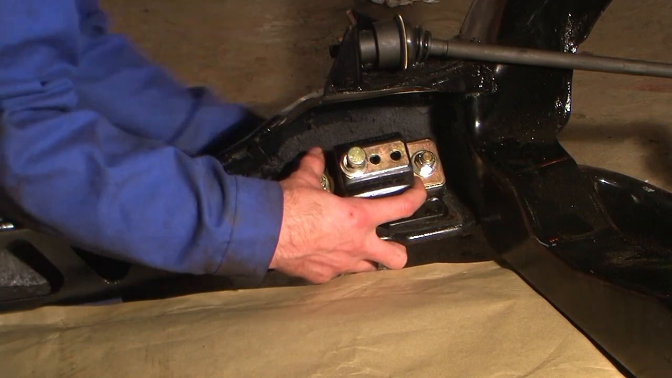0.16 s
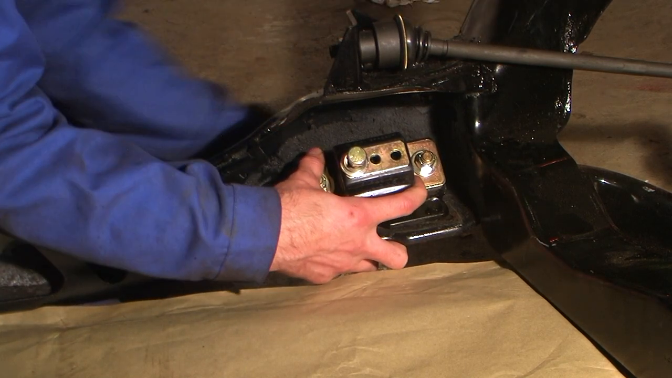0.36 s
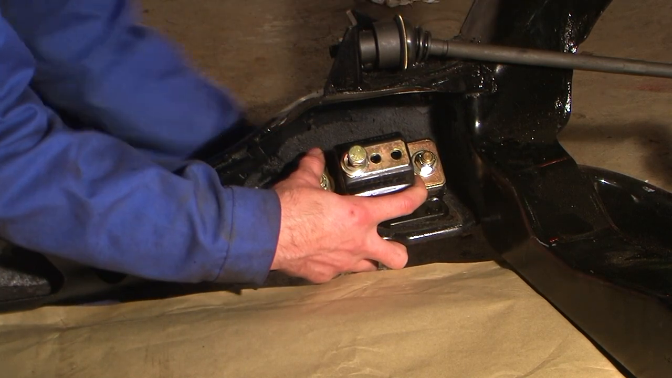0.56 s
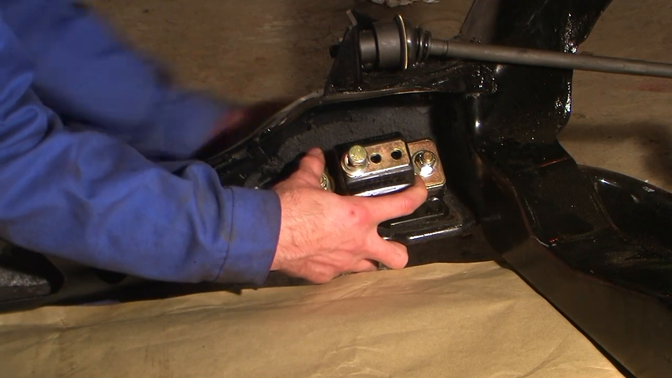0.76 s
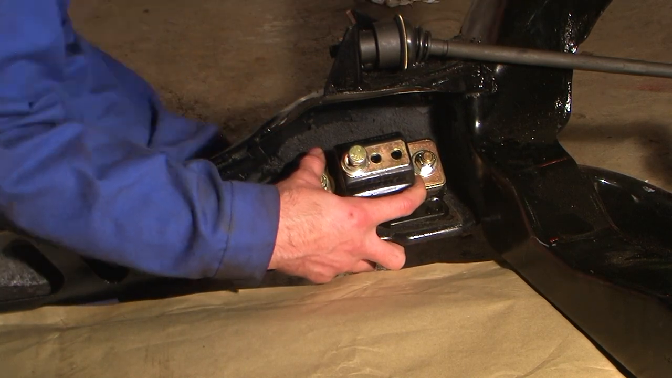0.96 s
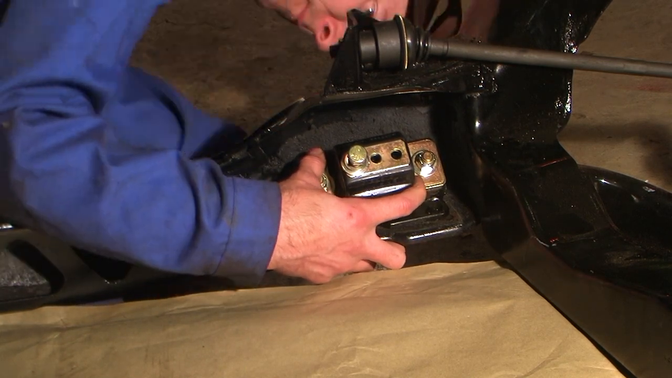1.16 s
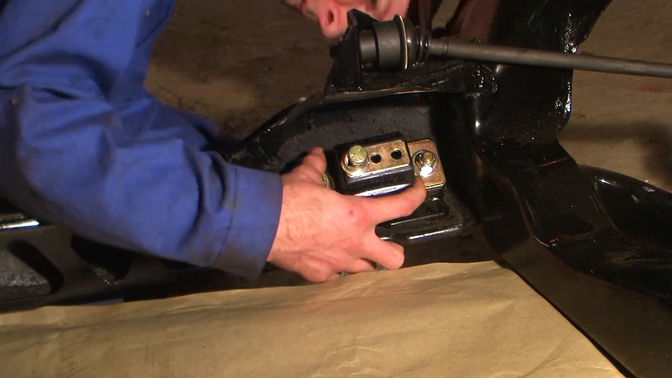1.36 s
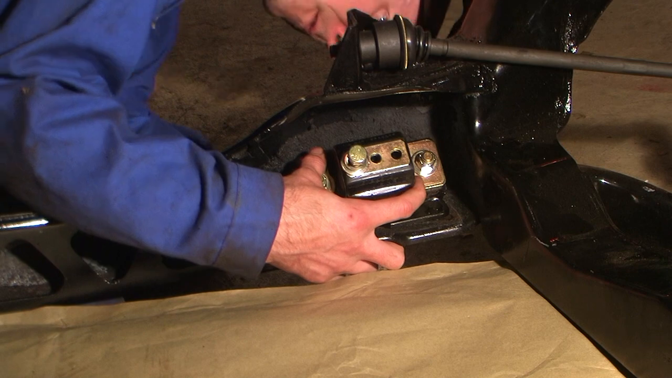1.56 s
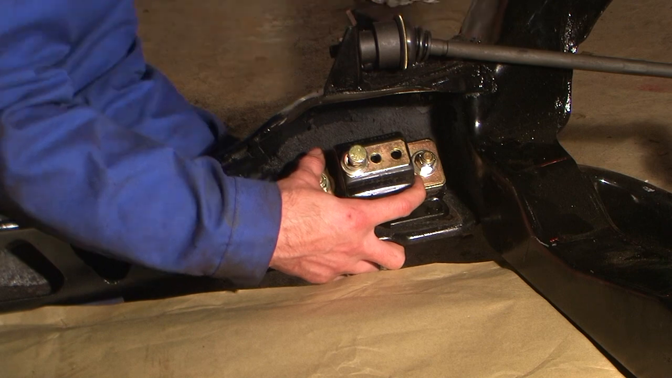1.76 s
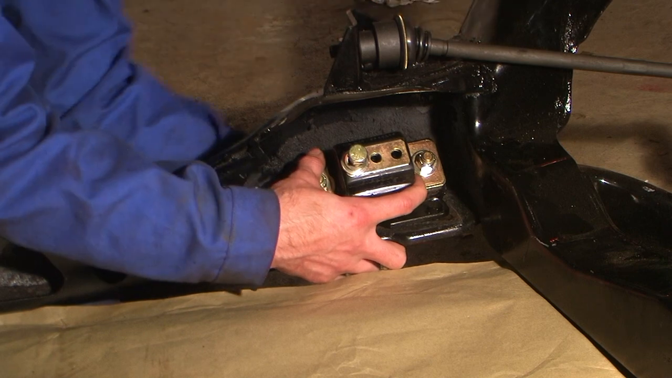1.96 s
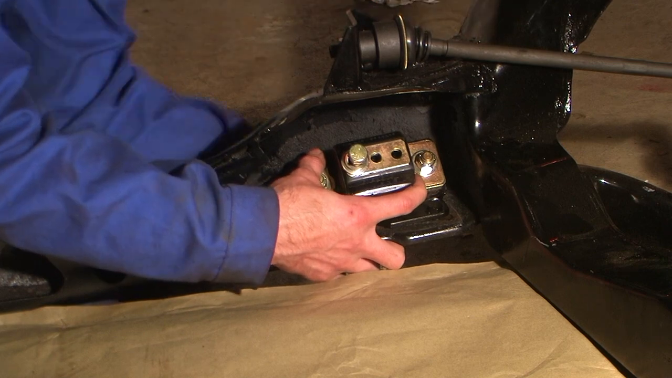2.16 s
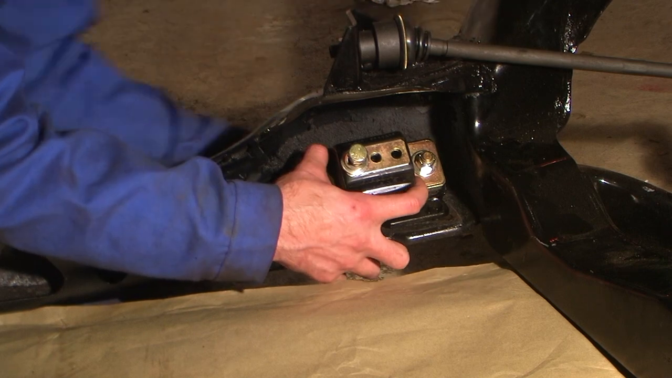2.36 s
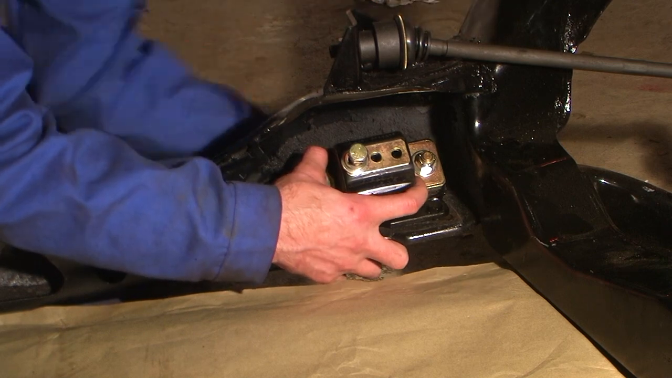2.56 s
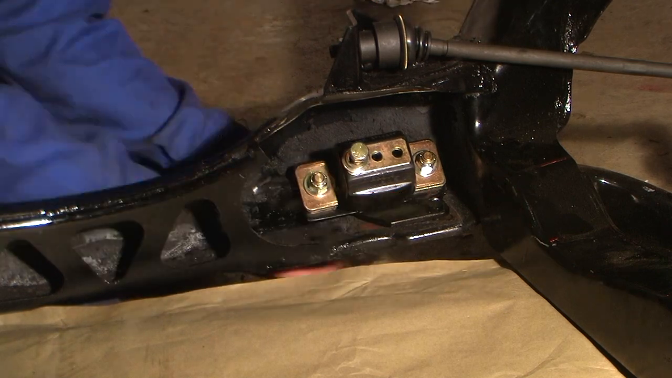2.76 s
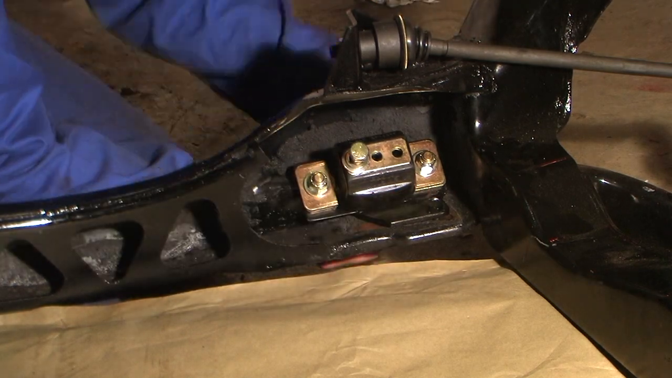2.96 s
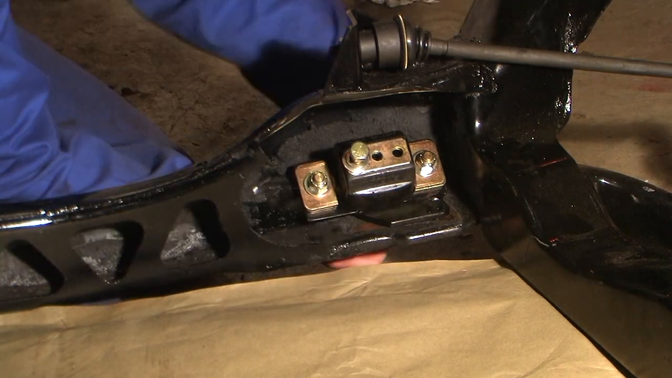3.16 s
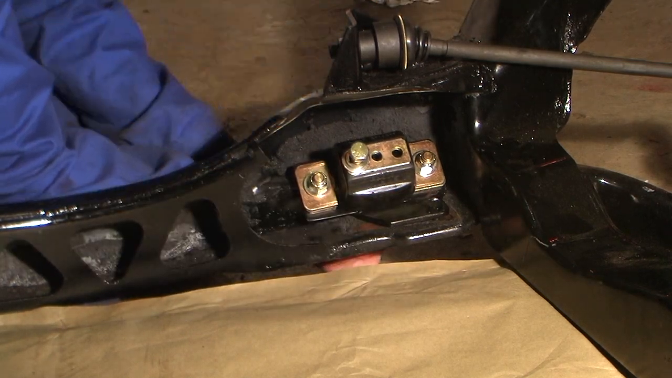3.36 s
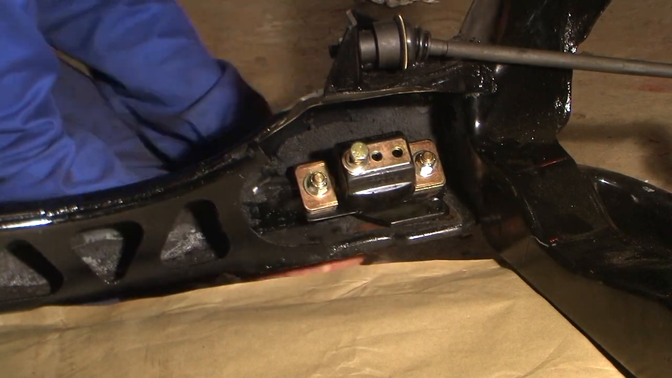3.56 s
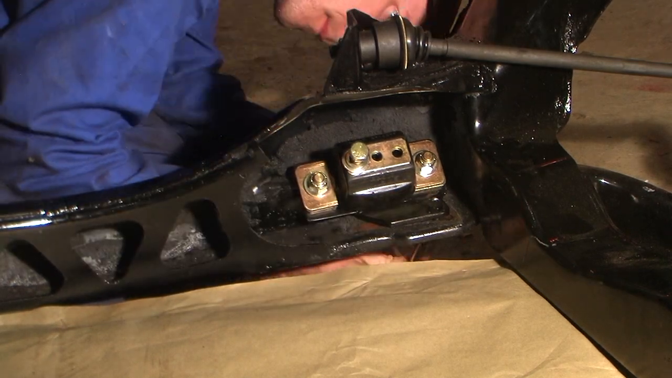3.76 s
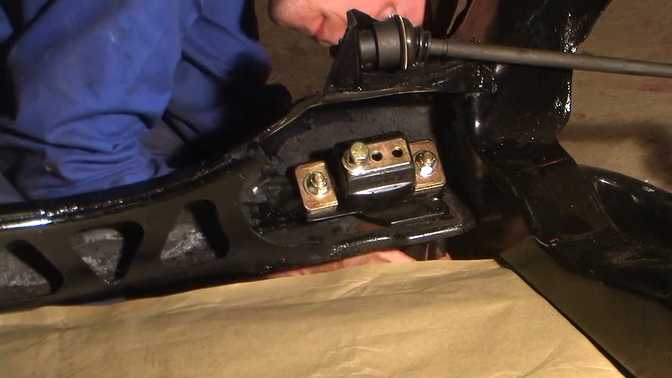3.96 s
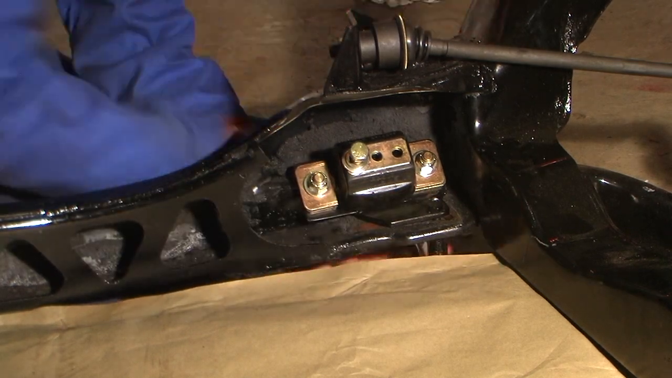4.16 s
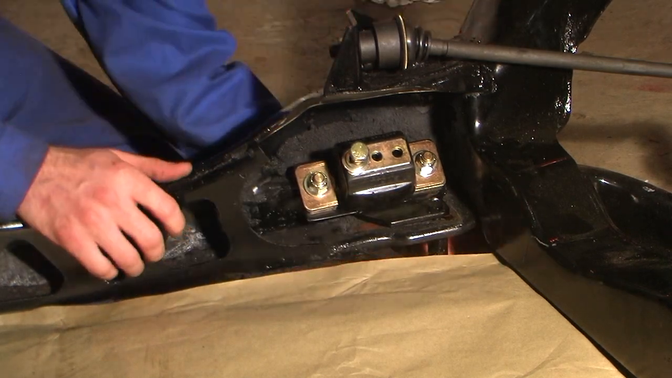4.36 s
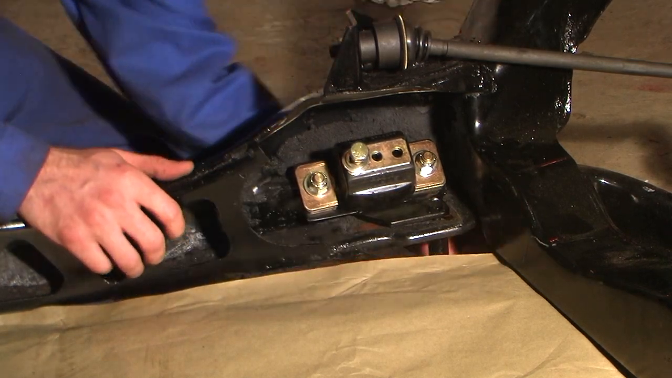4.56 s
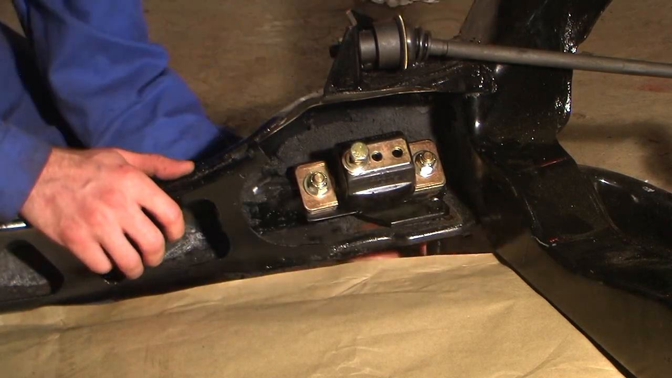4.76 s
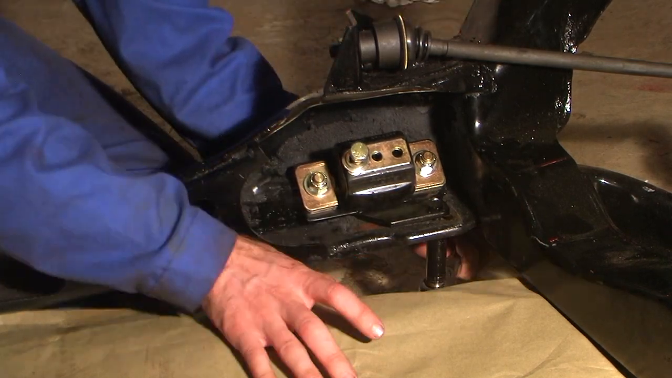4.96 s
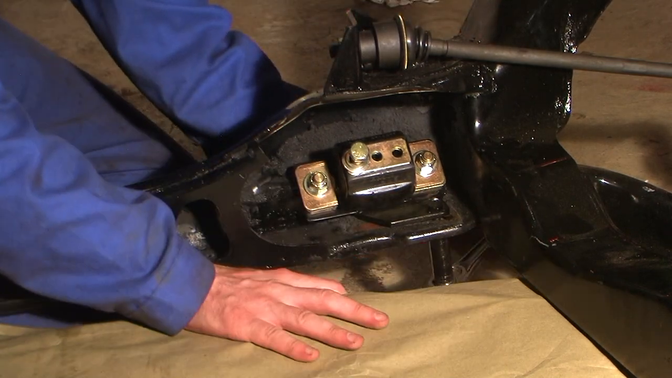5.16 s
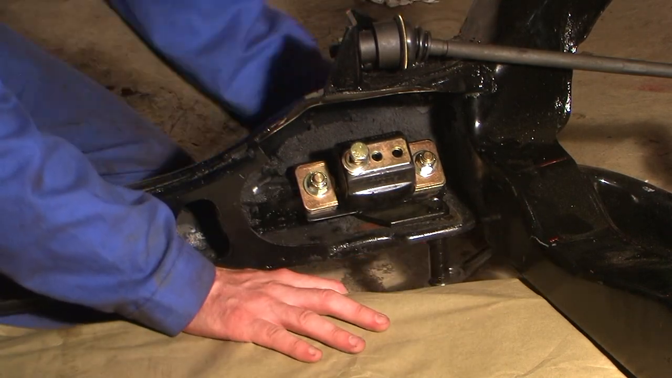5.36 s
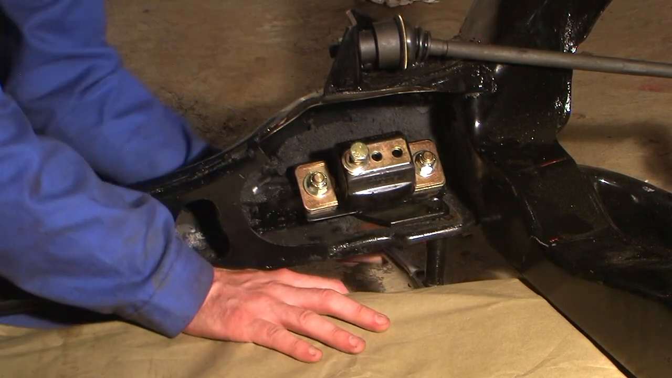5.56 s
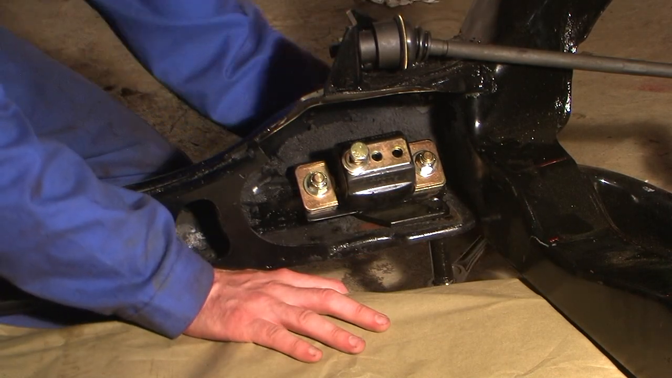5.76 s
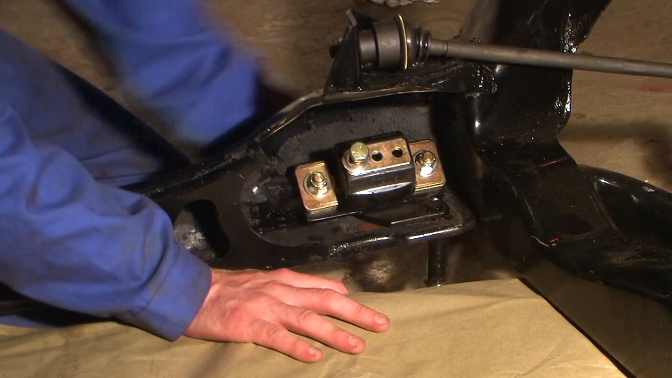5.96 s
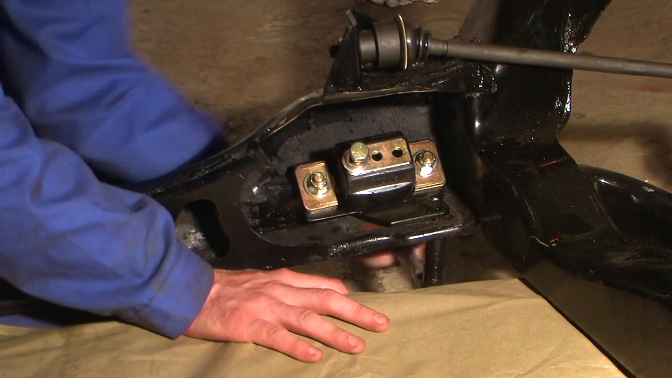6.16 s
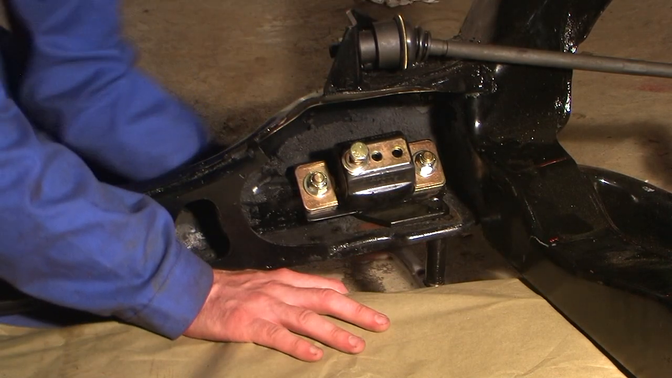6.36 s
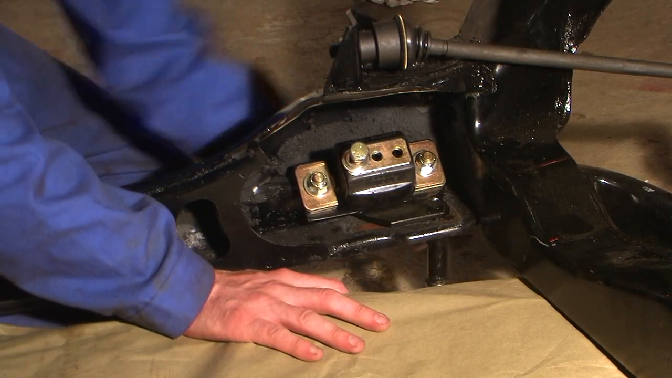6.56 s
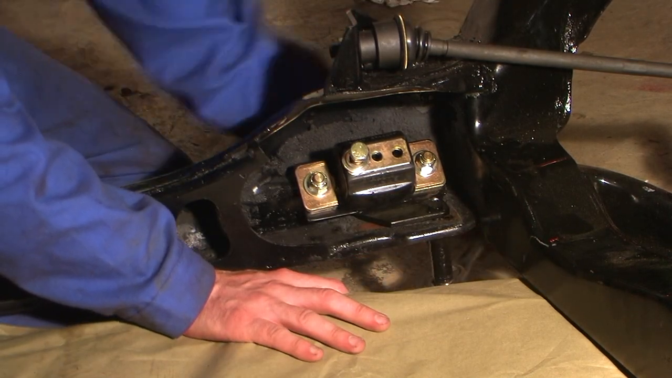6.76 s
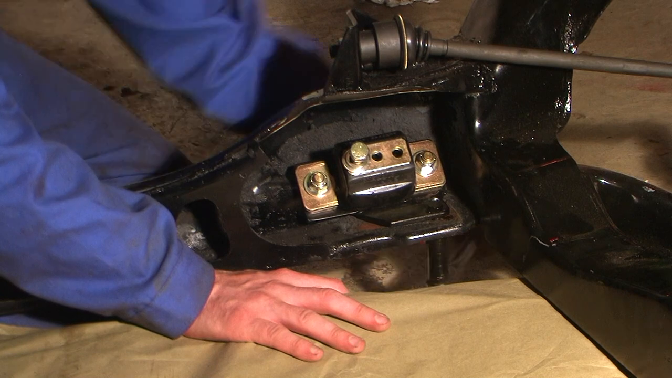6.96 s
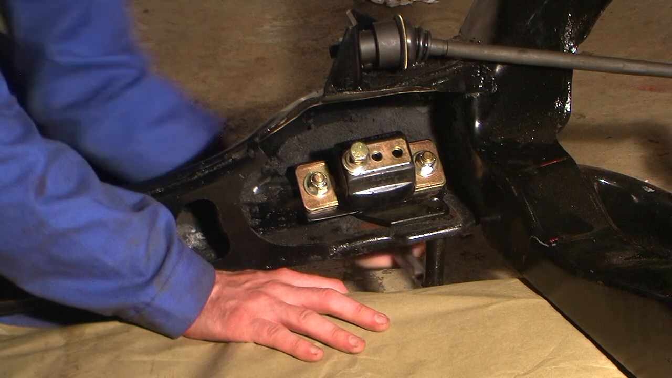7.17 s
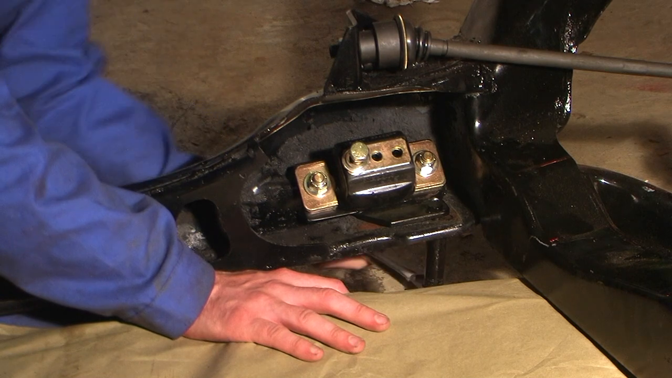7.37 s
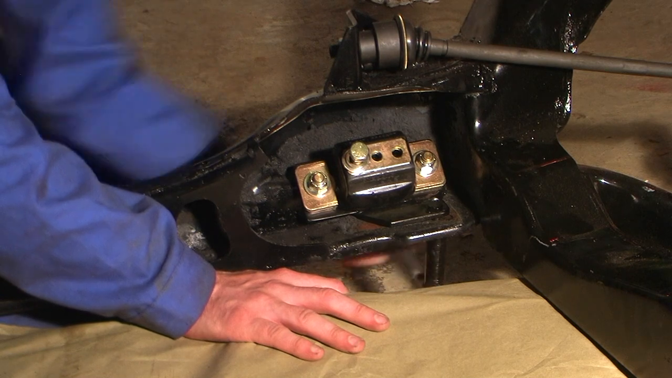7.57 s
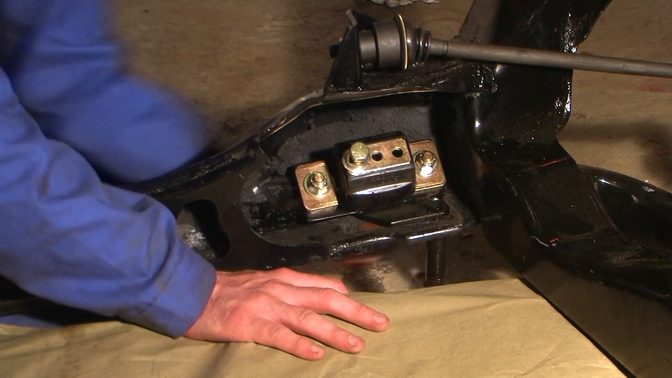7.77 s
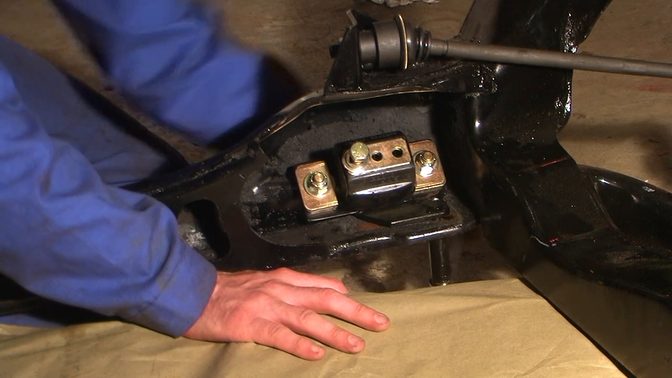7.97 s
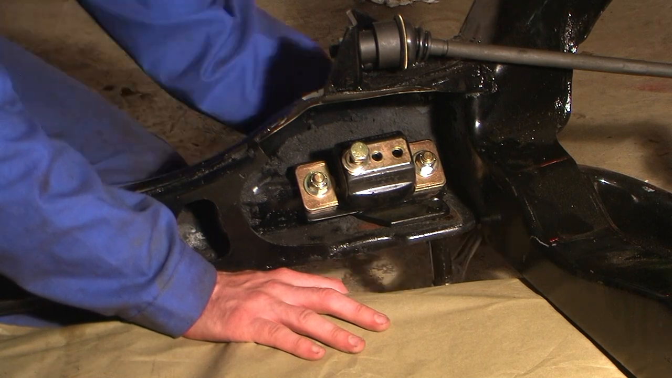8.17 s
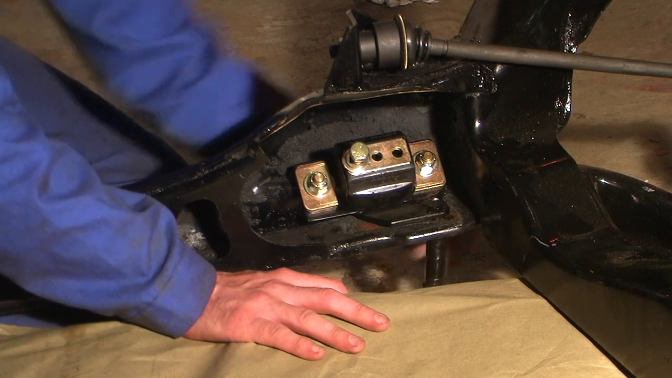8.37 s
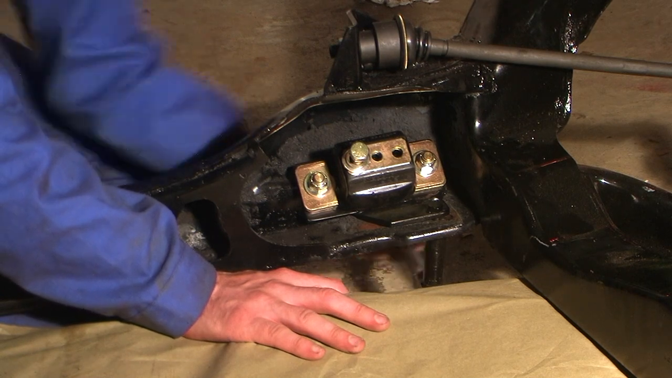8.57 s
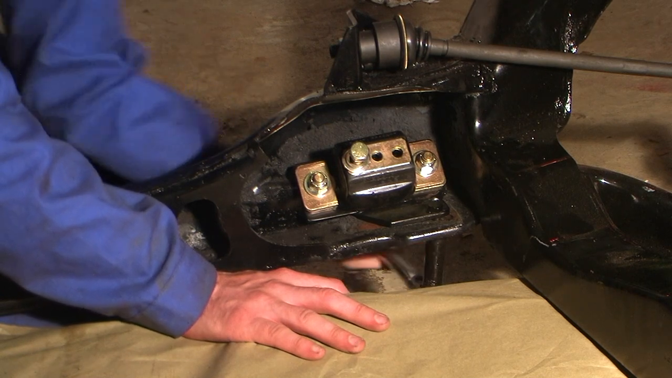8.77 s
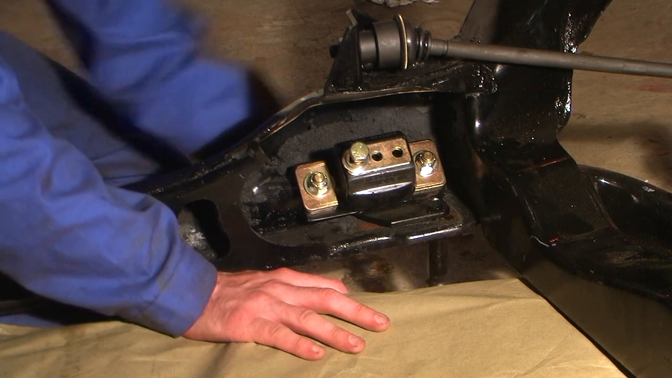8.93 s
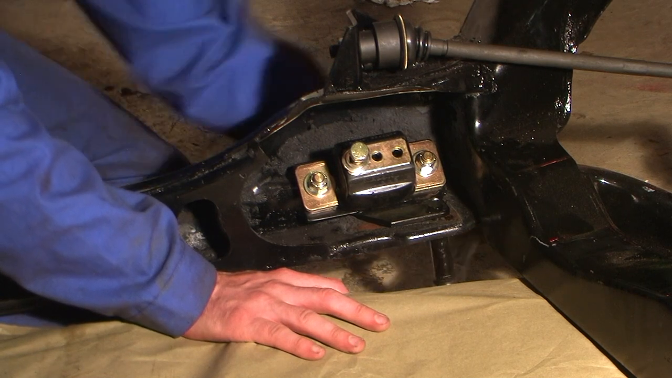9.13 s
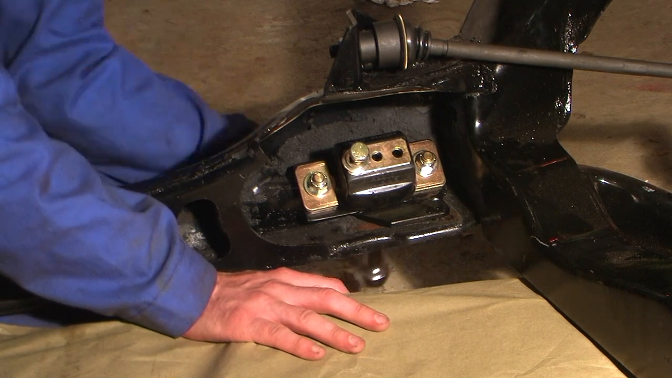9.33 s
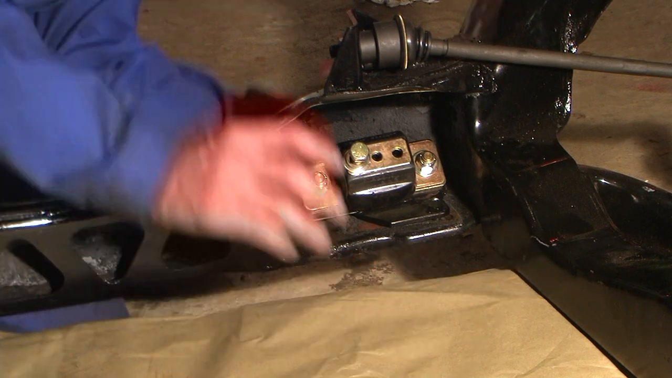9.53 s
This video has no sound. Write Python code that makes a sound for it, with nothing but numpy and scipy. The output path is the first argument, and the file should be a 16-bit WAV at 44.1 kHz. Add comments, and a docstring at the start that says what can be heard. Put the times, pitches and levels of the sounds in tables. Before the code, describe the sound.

Uneven steel scraping and small rattling knocks come first, loudest around the first second, then thin out. Midway come a dull knock, a few slower turns and papery brushing. Short metallic rasps follow at about nine a second, thinner and higher as they go, with small ticks among them, stopping at a loud clank. Close microphones, cloth rustle, quiet room air, very short tail.

```python
"""A small garage: a mechanic runs up the nuts of a mount on a steel subframe with a hand wrench.
First the bolts scrape unevenly into their seats, with steel knocks and clanks on the frame.
Halfway a hand slides over a paper sheet; the turns settle to about nine a second, up to a last clank.
Scrapes and turns are swarms of tiny slips, knocks are flurries of contacts, both rung through the frame;
sleeve rustle, low rumble and air rush are coloured noise, and a short tail follows the work."""
import sys
import numpy as np
from scipy import signal
from scipy.fft import rfft, irfft, next_fast_len
from scipy.io import wavfile
from scipy.ndimage import map_coordinates

SR = 44100
rng = np.random.default_rng(int(sys.argv[2]) if len(sys.argv) > 2 else 0)


def dump_mix(stems):
    """Bounce the given channels to the path in sys.argv[1] as a 16-bit WAV at rate SR."""
    frames = np.atleast_2d(stems).T  # one column per channel
    limited = np.clip(frames, -1, 1)  # hard clip at full scale
    pcm = np.round(limited * 32767).astype(np.int16)
    wavfile.write(sys.argv[1], SR, pcm)


N = 427769

# quick turns of the free-running nut: start_s, length_s, level_db
NUT_TURNS = [(4.244, 0.076, -41.5), (4.511, 0.031, -42), (4.646, 0.048, -36.5), (4.713, 0.018, -35),
             (4.833, 0.039, -39.5), (5.23, 0.017, -47), (5.361, .054, -41.5), (5.49, 0.05, -42),
             (5.641, 0.047, -39.5), (5.75, 0.06, -40), (5.875, 0.037, -40), (5.972, 0.051, -39),
             (6.094, 0.057, -39), (6.204, 0.035, -38), (6.323, 0.042, -39), (6.422, 0.051, -40),
             (6.526, .049, -37.5), (6.643, 0.04, -40.5), (6.749, 0.04, -42), (6.866, 0.032, -38),
             (6.974, 0.034, -35), (7.08, 0.041, -36.5), (7.189, 0.048, -39), (7.319, 0.047, -40.5),
             (7.426, 0.051, -40), (7.532, 0.036, -38), (7.625, 0.049, -36.5), (7.74, 0.071, -36),
             (7.831, 0.035, -34), (7.941, 0.053, -40.5), (8.046, 0.047, -34.5), (8.157, 0.039, -39.5),
             (8.272, 0.038, -37.5), (8.376, 0.036, -32), (8.487, 0.028, -33), (8.582, 0.049, -34.5),
             (8.697, 0.045, -38), (8.804, .043, -35), (8.911, 0.034, -33.5), (9.015, 0.038, -35.5),
             (9.067, .023, -32), (9.117, 0.051, -37.5), (9.22, 0.032, -34.5), (9.263, 0.012, -34.5)]
# resonances and hollows of the frame with the tool on it: centre_hz, width_hz, gain_db
FRAME_MODES = [(310, 130, 4.5), (443, 84, -3), (634, 410, 1.5), (880, 68, -1.5), (980, 60, 4),
               (1140, 190, -4.5), (1298, 46, 3), (1470, 29, -2), (1692, 39, 2), (1860, 16, 3),
               (2270, 130, -5), (2490, 67, 5), (2770, 72, 2.5), (2877, 60, 4.5), (3200, 60, 1),
               (3560, 85, 1.5), (3783, 60, 3), (4550, 63, 0.5), (4540, 110, -4), (5150, 270, 3),
               (5740, 57, 1), (5970, 51, 2), (6600, 51, 1), (9770, 1270, 7), (13200, 730, 4)]
LEAD_S = 0.004  # pressure builds just before the steel slips


def amp(db):
    """Decibels to gain."""
    return 10 ** (np.asarray(db) / 20)


def unit(x):
    """x at rms 1."""
    return x / np.sqrt(np.mean(x ** 2) + 1e-20)


def along(points, hz):
    """(Hz, value) points read on a log axis."""
    f, v = np.transpose(points)
    return np.interp(np.log(hz + 1), np.log(f + 1), v)


def peaks(modes, hz):
    """Summed gain in dB of (centre Hz, width Hz, dB) resonances."""
    return sum(db / (1 + (2 * (hz - centre) / width) ** 2) for centre, width, db in modes)


def wobble(rate_hz, size):
    """A smooth random curve with rate_hz knots a second."""
    knots = rng.standard_normal(int(size * rate_hz / SR) + 4)
    return map_coordinates(knots, [np.arange(size) * rate_hz / SR])


def add(track, s, sound):
    """Mix a sound into the track at time s."""
    start = max(round(s * SR), 0)
    part = track[:, start:start + sound.shape[1]]
    part += sound[:, :part.shape[1]]


def shaped(pair, colour):
    """Two unrelated signals become left and right, rung through a causal colour (dB as a function of Hz)."""
    # left-right likeness: freq_hz, correlation
    likeness = [(100, 0.79), (300, 0.68), (600, 0.79), (1500, 0.79), (3000, 0.72), (6000, 0.48),
                (9000, 0.23), (15000, 0.2)]
    size = pair.shape[1]
    m = 2 * next_fast_len(size // 2 + 2048)
    hz = np.fft.rfftfreq(m, 1 / SR)
    # the folded cepstrum gives the minimum-phase response
    cepstrum = irfft(np.log(amp(colour(hz))))
    cepstrum[1:m // 2] *= 2
    cepstrum[m // 2 + 1:] = 0
    response = np.exp(rfft(cepstrum))
    angle = np.arccos(np.clip(along(likeness, hz), -1, 1)) / 2
    mid, side = irfft(rfft(pair, m) * response * [np.cos(angle), np.sin(angle)])[:, :size]
    return np.array([mid + side, mid - side])


def turns():
    """Turns alike but for the grip; they grow thinner and ring higher as the free thread shortens."""
    swell_mean_db, swell_spread_db = -3, 3.5  # a turn tends to ease off as it goes
    first_body_db, body_db_per_s = 6, -0.66  # low mids
    fizz_mean_db, grip_spread_db = -1.5, 2.6  # treble; change of colour from grip to grip
    first_ring_hz, ring_octaves_per_s, ring_spread_octaves = 1680, 0.214, 0.29
    out = np.zeros((2, N))
    grips = rng.standard_normal((len(NUT_TURNS), 4))
    for (start_s, length_s, level_db), (swell, body, fizz, ring) in zip(NUT_TURNS, grips):
        elapsed_s = start_s - NUT_TURNS[0][0]
        swell_db = swell_mean_db + swell_spread_db * swell
        body_db = first_body_db + body_db_per_s * elapsed_s + grip_spread_db * body
        fizz_db = fizz_mean_db + grip_spread_db * fizz
        pitch_hz = first_ring_hz * 2 ** (ring_octaves_per_s * elapsed_s + ring_spread_octaves * ring)
        sound = slide(length_s, swell_db, body_db, fizz_db, pitch_hz, ring_db=5)
        add(out, start_s - LEAD_S, amp(level_db) * sound)
    return out


def scrapes():
    """The bolts are worked into their holes, each push with its own swell and brightness."""
    # pushes: start_s, length_s, level_db, swell_db (start to end), fizz_db, pitch_hz
    pushes = [(0.0, 0.027, -41, -32, -0.5, 3480), (0.188, 0.034, -32.5, -2, -2, 2780),
              (0.313, 0.051, -37.5, 0, -1.5, 3000), (0.428, 0.069, -37, -2, -3.5, 3530),
              (.569, 0.061, -37.5, 4, -1, 3570), (.711, 0.035, -34, 3, -3.5, 2820),
              (0.79, 0.048, -25, -9, -14, 2750), (.852, 0.0065, -17, -7, -14, 3530),
              (1.271, 0.048, -38, 1, -19, 2460), (1.332, 0.031, -35, 18, -13.5, 3000),
              (1.554, 0.036, -38.5, -17, 3.5, 4370), (1.688, 0.066, -38.5, 3.5, -4.5, 2770),
              (1.854, 0.032, -27, -4, -3.5, 4740), (1.983, 0.014, -34, 4, -6, 5700),
              (2.004, 0.016, -21, -9.5, -10, 5770), (2.458, 0.054, -35.5, 8, -2, 2950),
              (2.603, 0.02, -49.5, 3, 4, 4470), (2.66, 0.03, -42.5, 12, -13, 5790),
              (2.817, 0.098, -39, -7.5, 0, 5960), (3.062, .033, -51.5, -9, 1, 4260),
              (3.134, 0.066, -42, 12, -2, 2464), (3.547, 0.02, -42.5, -22, -25.5, 1820)]
    out = np.zeros((2, N))
    for start_s, length_s, level_db, swell_db, fizz_db, pitch_hz in pushes:
        ring_db = 4 + pitch_hz / 1000  # a higher ring stands out more
        sound = slide(length_s, swell_db, -2.5, fizz_db, pitch_hz, ring_db)
        add(out, start_s - LEAD_S, amp(level_db) * sound)
    return out


def slide(length_s, swell_db, body_db, fizz_db, pitch_hz, ring_db):
    """Steel scrapes and catches; the frame colours it, and the grip lets one resonance sing."""
    # sliding steel spectrum: freq_hz, density_db (per Hz)
    steel_spectrum = [(100, -22), (350, -18), (800, -7), (1500, 0), (3000, -2), (4500, 1), (6500, -1),
                      (8200, -5.5), (12000, -7), (16000, -12.5)]
    grip = [(1600, body_db), (3800, 0), (11000, fizz_db), (16000, 2.2 * fizz_db)]

    def steel(hz):
        return along(steel_spectrum, hz) + along(grip, hz) + peaks(FRAME_MODES, hz)

    def singing(hz):
        return steel(hz) + peaks([(pitch_hz, 250, ring_db)], hz)

    def bright(hz):
        return steel(hz) + along([(2000, 1), (7000, 3.53), (14000, 22)], hz)

    sound = rub(length_s + 0.0016, swell_db, singing,
                grit_db=3.5, uneven_db=1.5, rise_s=0.013, release_s=0.0086)
    ticks = catches(length_s, bright, decay_s=0.0011, count=4)
    add(sound, 0.004, amp(-13.5 + 0.33 * fizz_db) * ticks)
    return sound


def rub(length_s, swell_db, colour, grit_db, uneven_db, rise_s, release_s):
    """A sliding contact: a swarm of tiny, very unequal slips under unsteady pressure; rms 1 at pressure 1."""
    t = np.arange(int((length_s + 0.08) * SR)) / SR
    slip_db = grit_db * wobble(2500, len(t)) + uneven_db * wobble(169.5, len(t))
    slips = rng.standard_normal((2, len(t))) * amp(slip_db)
    onset = np.sin(np.pi / 2 * np.minimum(t / rise_s, 1)) ** 2
    swell = amp(swell_db * (np.minimum(t / length_s, 1) - 0.5))
    release = np.exp(-np.maximum(t - length_s, 0) / release_s)
    pressure = onset * swell * release
    sound = shaped(slips * pressure, colour)
    return sound * np.sqrt(np.sum(pressure ** 2) / np.sum(sound ** 2 / 2))


def catches(length_s, colour, decay_s, count):
    """A few sharp ticks where the sliding steel catches, together of rms 1 over the length."""
    ticks = np.zeros((2, int((length_s + 0.08) * SR)))
    t = np.arange(SR // 200) / SR
    for place in rng.uniform(0.1, 0.9, count):
        tick = np.exp(-t / decay_s) * rng.standard_normal((2, len(t)))
        add(ticks, place * length_s, amp(rng.normal(0, 4)) * tick)
    sound = shaped(ticks, colour)
    return sound * np.sqrt(length_s * SR / np.sum(sound ** 2 / 2))


def knocks():
    """Tool and bolts strike the nut and the frame."""
    # blows: start_s, level_db, rattle_s, pitch_hz, clang_db, edge_db (treble)
    blows = [(.041, -44, .0055, 1040, -7, -43), (0.157, -33, 0.0098, 590, -5, -40),
             (0.416, -31, 0.0078, 706, -8, -42), (0.551, -32, 0.0096, 660, -8, -29),
             (0.644, -30, .0041, 1170, -1, -43), (.694, -40, 0.0048, 1500, 7, -29.5),
             (.733, -24.5, 0.0043, 2880, 19, -16), (.808, -8, .0013, 1620, -2, -18),
             (1.0027, -10.5, 0.005, 1520, -6, -39), (1.327, -31.5, 0.02, 1000, 4, -37),
             (1.475, -41, 0.011, 630, -5, -30), (1.598, -44, 0.0049, 900, -3, -21),
             (1.776, -36, 0.0024, 1610, 4, -16), (1.884, -30, .011, 963, -9, -27),
             (2.007, -26, 0.0093, 1200, 4.5, -23), (2.398, -49.5, 0.0047, 6000, 2, 6),
             (2.467, -28, 0.0078, 980, -14, -43), (2.678, -27.5, 0.0014, 1190, -2, -11),
             (2.823, -27.5, 0.0072, 1020, -6, -22), (3.131, -26.5, 0.0074, 976, -1, -21),
             (3.187, -27, 0.0034, 3190, 4, 1), (3.848, -36, .013, 1280, -9, -31),
             (3.924, -42.5, 0.0048, 760, -14, -31), (4.0235, -20.5, 0.0039, 1770, -15, -21.5),
             (4.245, -36.5, 0.0045, 1880, -8, -15), (4.268, -33.5, 0.0027, 1900, -19, -19),
             (5.473, -35, 0.0052, 1690, -2, -17), (5.515, -33, 0.0028, 1670, -4, -7),
             (5.612, -43.5, 0.0036, 463, -19, -33), (6.009, -29.5, 0.0021, 2200, 1, -5),
             (6.137, -41, 0.0097, 574, -5, -29), (6.259, -26.5, .01, 1560, -4, -15.5),
             (6.322, -31.5, .0028, 2220, 5, -12), (6.603, -41.5, 0.0032, 517, -12, -21),
             (6.767, -33.5, .0036, 1900, -5, -2), (7.451, -35, 0.0077, 550, -2, -27),
             (7.969, -30.5, 0.0028, 3680, 5, -7), (8.17, -33, .003, 4360, 12, -2),
             (8.179, -27, 0.0023, 3540, -1, -9), (8.429, -30, 0.0064, 915, -10, -24),
             (8.621, -27, 0.0013, 3680, 15, 1), (9.072, -30.5, 0.0044, 2480, 15, -9),
             (9.258, -24.5, 0.0094, 287, 6, -0.5), (9.2872, -11, 0.0026, 1806, -0.5, -14.5),
             (9.31, -28, 0.0067, 1830, -1, -27), (9.52, -36.5, 0.0083, 740, 1, -15)]
    out = np.zeros((2, N))
    for start_s, level_db, rattle_s, pitch_hz, clang_db, edge_db in blows:
        add(out, start_s, amp(level_db) * knock(rattle_s, pitch_hz, clang_db, edge_db))
    return out


def bumps():
    """Now and then the wrench bumps softly against the frame as it swings back after a turn."""
    chance, within_s, level_db = 0.4, 0.098, -44
    low_hz, high_hz = 510, 870
    out = np.zeros((2, N))
    draws = rng.random((len(NUT_TURNS), 3))
    for (start_s, _, _), (luck, when, where) in zip(NUT_TURNS, draws):
        pitch_hz = low_hz + where * (high_hz - low_hz)
        sound = knock(0.0067, pitch_hz, clang_db=-7, edge_db=-27)
        add(out, start_s + when * within_s, (luck < chance) * amp(level_db) * sound)
    return out


def knock(rattle_s, pitch_hz, clang_db, edge_db):
    """A blow and a brief rattle; the part hit rings with a pitch and one overtone, and thuds by its weight."""
    # steel blow spectrum: freq_hz, density_db (per Hz)
    blow_spectrum = [(60, -33.5), (200, -18.5), (420, -6.5), (600, -1), (1500, 0), (3400, -2), (6000, 7.5),
                     (10000, 3.5), (16000, -10)]
    middle_hz, thud_db_per_octave, thud_most_db = 1100, -9, 14  # lower pitch: heavier part, more thud
    t = np.arange(SR // 6) / SR
    attack = 1 - np.exp(-t / (0.083 * rattle_s))
    force = np.exp(-(t / (2.16 * rattle_s)) ** 1.9) * attack
    thud_db = min(thud_db_per_octave * np.log2(pitch_hz / middle_hz), thud_most_db)
    thud_hz = min(pitch_hz, 770)
    hardness = [(thud_hz, thud_db), (2 * thud_hz, 0), (3600, clang_db), (6500, edge_db)]
    modes = FRAME_MODES + [(pitch_hz, 150, 8), (1.8 * pitch_hz, 150, 6)]

    def colour(hz):
        return along(blow_spectrum, hz) + along(hardness, hz) + peaks(modes, hz)

    sound = shaped(burst(force), colour)
    return amp(1.03) * sound * np.sqrt(rattle_s * SR / np.sum(sound ** 2 / 2))


def burst(force):
    """A flurry of contacts under a force curve; it excites all frequencies nearly evenly."""
    spectrum = rfft(rng.standard_normal((2, len(force))) * force)
    evened = spectrum / np.sqrt(np.abs(spectrum) + 1e-12)
    return irfft(evened, len(force)) * np.sqrt(force)


def paper():
    """A hand brushes over the stiff sheet: sliding contacts in the paper's colour."""
    # strokes: start_s, length_s, level_db (before the common 2 dB lift), swell_db (start to end)
    strokes = [(4.948, 0.038, -35.5, -0.5), (5.007, 0.069, -38.5, -11), (5.092, 0.019, -41, 2),
               (5.141, 0.015, -40.5, -22), (5.199, 0.031, -42.5, 5.5), (5.273, 0.013, -47, -32),
               (9.505, 0.041, -42.5, 1.5)]
    # paper spectrum: freq_hz, density_db (per Hz)
    sheet_spectrum = [(59, -29), (100, -16), (129, -17.5), (333, -1), (601, 1), (917, -8), (1430, -2.5),
                      (2420, -6), (8060, -18), (11500, -26), (15500, -39)]
    out = np.zeros((2, N))
    for start_s, length_s, level_db, swell_db in strokes:
        sound = rub(length_s, swell_db, lambda hz: along(sheet_spectrum, hz),
                    grit_db=4.0, uneven_db=0.5, rise_s=0.005, release_s=0.018)
        add(out, start_s, amp(level_db + 2.0) * sound)
    return out


def sleeve():
    """The overalls rustle in small bursts as the arm works; low and high folds crumple apart."""
    # rustle course: time_s, level_db (before the common 2.5 dB lift)
    rustle_course = [(0.0, -57.5), (0.24, -55), (0.65, -50.5), (1.0, -64.5), (1.56, -61.5), (1.86, -56),
                     (2.16, -64.5), (2.65, -56), (3.48, -65), (4.83, -56), (5.11, -52.5), (5.35, -56.5),
                     (5.86, -53.5), (7.46, -54.5), (7.62, -52.5), (7.94, -51), (8.13, -57.5), (8.54, -53.5),
                     (8.75, -58.5), (9.16, -52), (9.32, -63.5), (9.7, -56.5)]
    # cloth spectrum: freq_hz, density_db (per Hz)
    cloth_spectrum = [(80, -27.5), (200, -5), (550, -4), (1200, -8), (2500, -11), (6000, -17),
                      (15000, -34.5)]
    level_db = np.interp(np.arange(N) / SR, *np.transpose(rustle_course))
    rustle = np.zeros((2, N))
    for fold_hz in (520, 780, 1400):
        crumple = amp(3.7 * wobble(25, N) + 4.8 * wobble(110, N))
        fold = [(fold_hz, 0.3 * fold_hz, 9)]
        rustle += shaped(crumple * rng.standard_normal((2, N)),
                         lambda hz: along(cloth_spectrum, hz) + peaks(fold, hz))
    return amp(level_db + 2.5) * unit(rustle)


def garage(x, wet_db, near_db):
    """Reflections from 5 ms on: a near tail off floor and frame, a duller one off walls, redrawn 3 times a s."""
    # wall decay: freq_hz, t60_s
    wall_decay = [(200, 0.21), (1000, 0.12), (3000, 0.16), (8000, 0.16), (15000, 0.05)]
    scatter_colour = [(300, -3.0), (2500, -0.5), (9000, -2), (14000, -12.5)]
    out, size = np.zeros((2, N)), SR // 3
    for start in range(0, N, size):
        scatter = shaped(rng.standard_normal((2, size)), lambda hz: along(scatter_colour, hz))
        scatter = scatter + 0.091 * rng.standard_normal((2, size))
        hz, t, z = signal.stft(scatter, SR, nperseg=256)
        walls = amp(wet_db - 60 * t / along(wall_decay, hz)[:, None])
        near = amp(near_db - 60 * t / 0.16)
        tail = signal.istft(z * (walls + near), SR, nperseg=256)[1]
        echo = signal.fftconvolve(x[:, start:start + size], tail, axes=1)
        add(out, start / SR + 0.005, echo)
    return out


def air():
    """The steady rush of the workshop, with a low rumble that comes and goes; both are coloured noise."""
    # rush spectrum: freq_hz, density_db (per Hz)
    rush_spectrum = [(12, -54), (20, -14), (44, -2.5), (65, 1), (88, -4.5), (101, 2), (158, -0.5),
                     (193, -17), (222, -12), (347, -18.5), (718, -15.5), (2600, -39), (10500, -25.5),
                     (16000, -44.5)]
    # rumble course: time_s, level_db
    rumble_course = [(0.0, -56), (3.78, -67.5), (3.97, -59.5), (4.92, -55.5), (5.16, -58), (5.37, -64),
                     (6.37, -68), (6.62, -57.5), (7.24, -65.5), (7.7, -57.5), (8.26, -66), (9.7, -59.5)]
    rumble_spectrum = [(40, -23.0), (90, -4.5), (160, -3.5), (260, -3.5), (500, -37.5)]
    rumble = unit(shaped(rng.standard_normal((2, N)), lambda hz: along(rumble_spectrum, hz)))
    rush = unit(shaped(rng.standard_normal((2, N)), lambda hz: along(rush_spectrum, hz)))
    rumble_db = np.interp(np.arange(N) / SR, *np.transpose(rumble_course))
    return amp(-61) * rush + amp(rumble_db) * rumble


def scene():
    """The work, its echo and the room's own rush."""
    work = turns() + scrapes() + knocks() + bumps() + paper() + sleeve()
    return work + garage(work, wet_db=-41.5, near_db=-43.5) + air()


def record(dry):
    """The microphone pair hears the bass more on the right and next to nothing above its band limit."""
    # channel balance: freq_hz, left_minus_right_db
    balance_curve = [(50, -5), (250, -2.5), (550, -2), (1200, -0.9), (4000, -.5), (9000, 0.2)]
    top_hz = 16000
    m = next_fast_len(N + SR // 2)
    hz = np.fft.rfftfreq(m, 1 / SR)
    balance = amp(np.outer([0.5, -0.5], along(balance_curve, hz)))
    band = 1 / np.sqrt(1 + (hz / top_hz) ** 200)
    return irfft(rfft(dry, m) * balance * band, m)[:, :N]


dry = scene()
out = record(dry)
dump_mix(out)
```